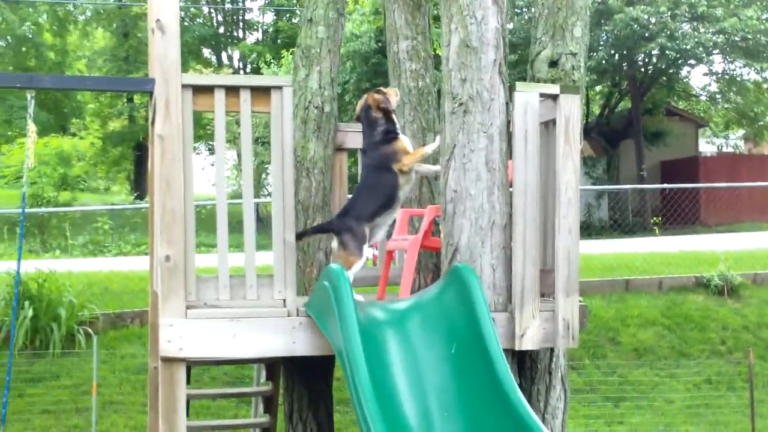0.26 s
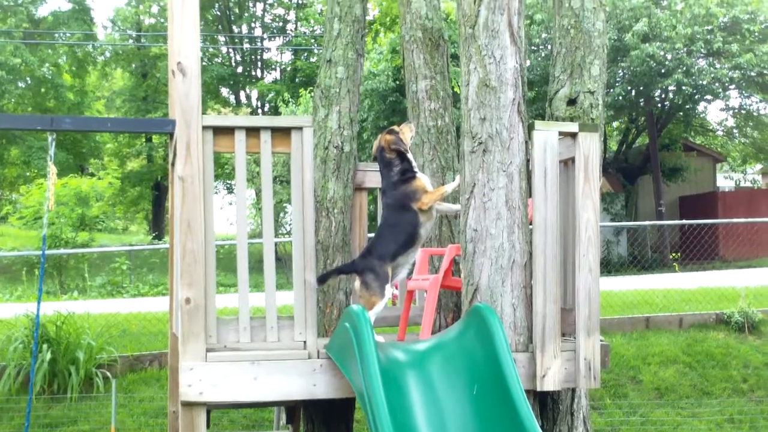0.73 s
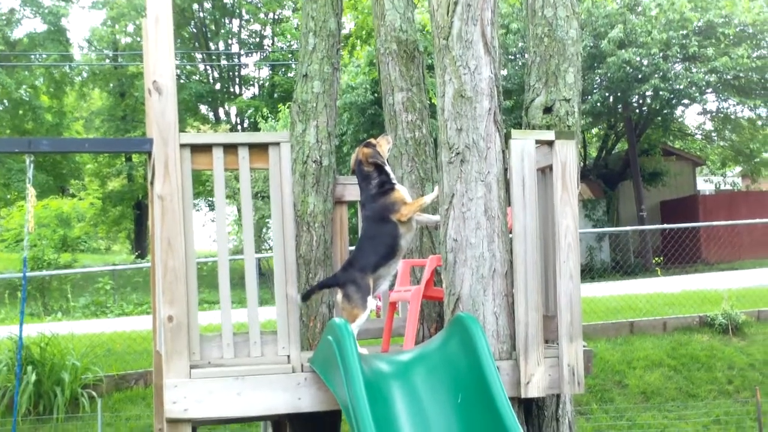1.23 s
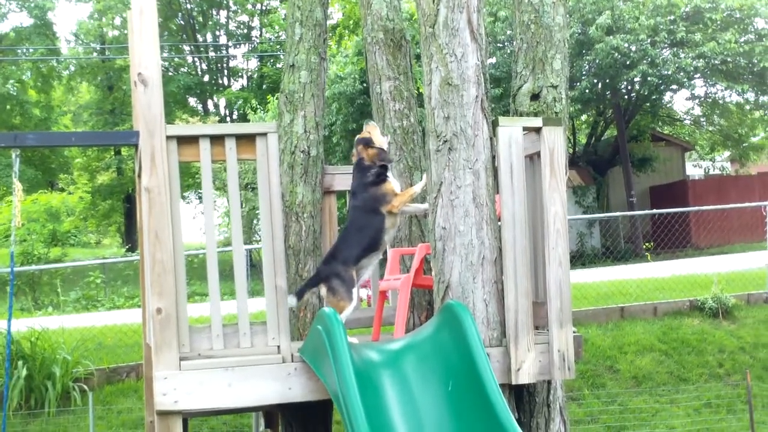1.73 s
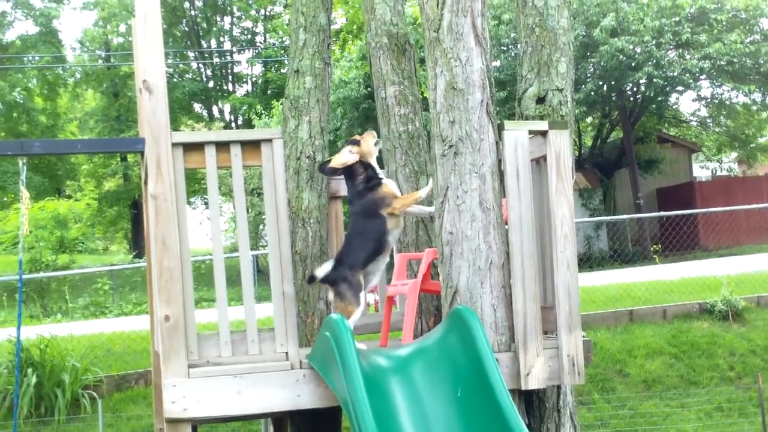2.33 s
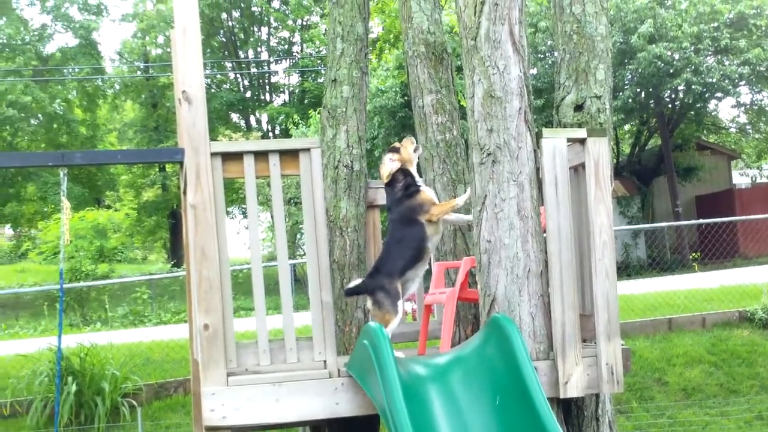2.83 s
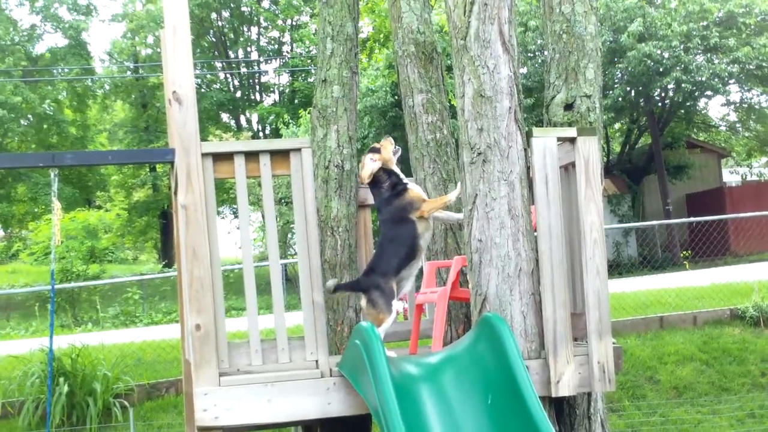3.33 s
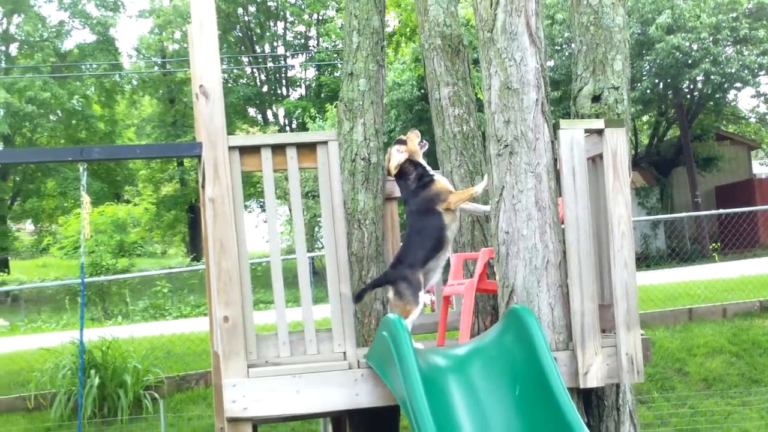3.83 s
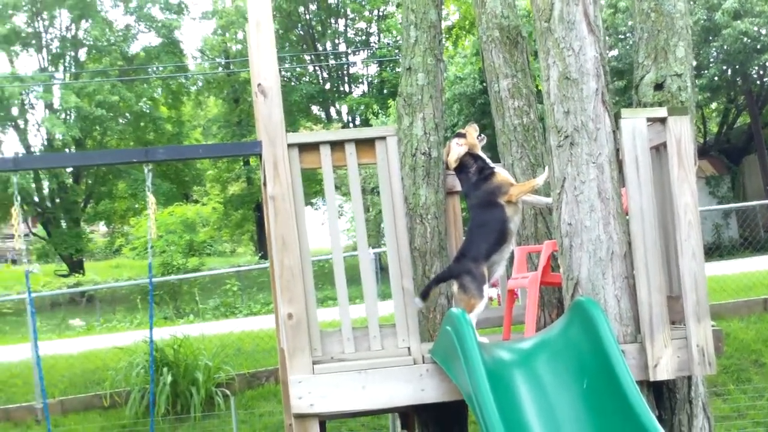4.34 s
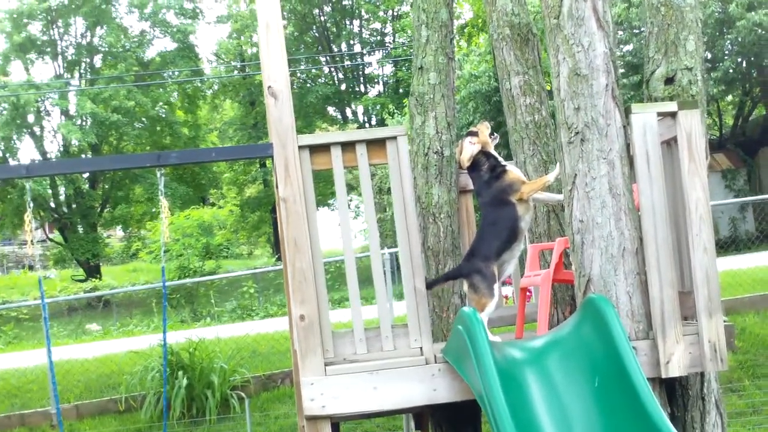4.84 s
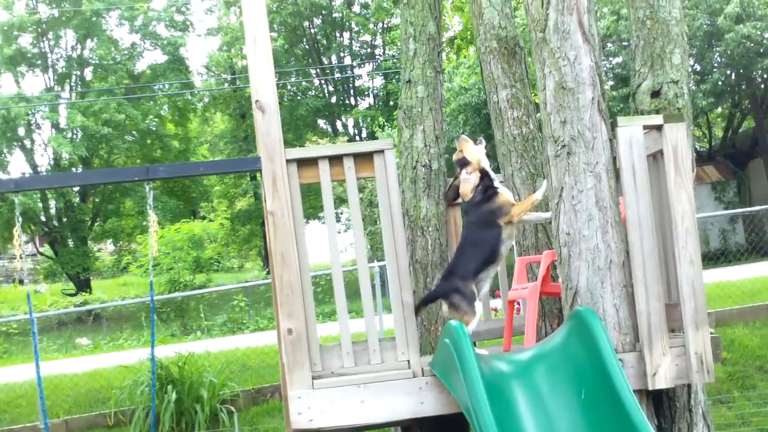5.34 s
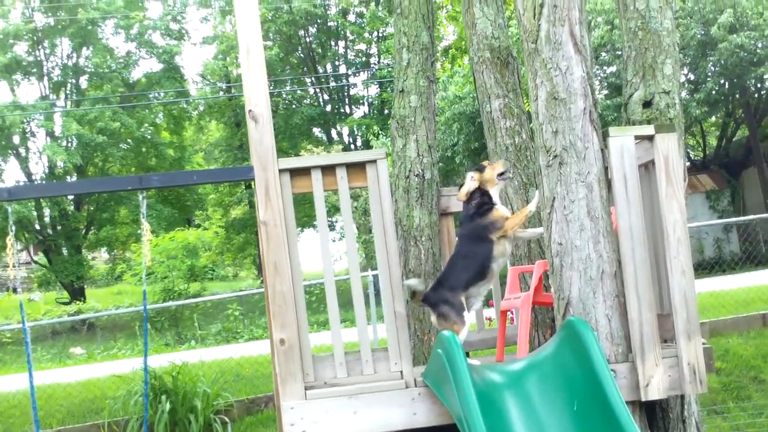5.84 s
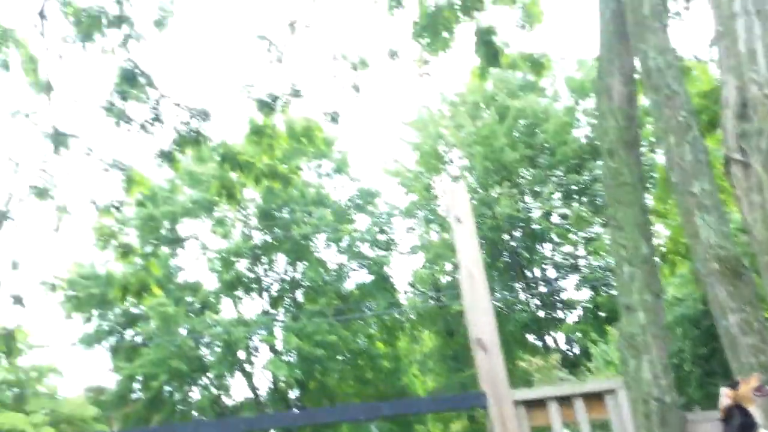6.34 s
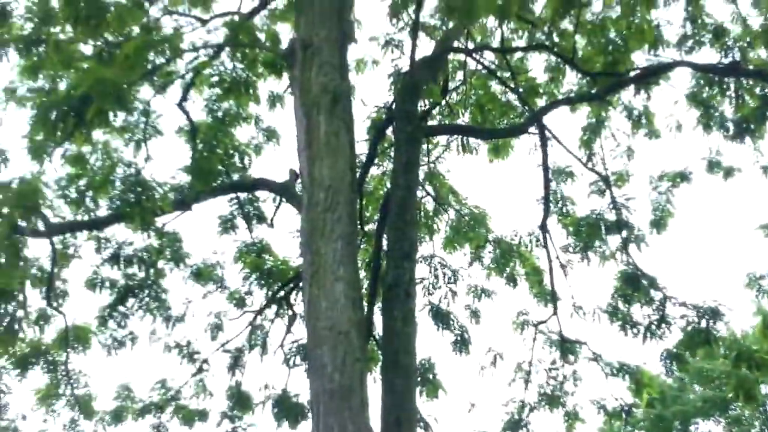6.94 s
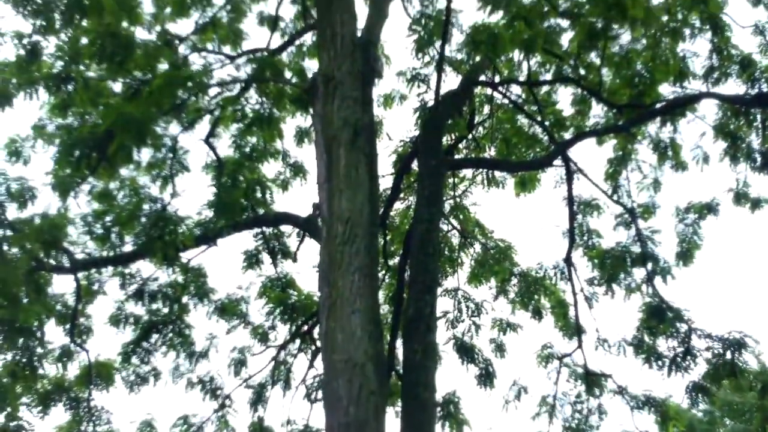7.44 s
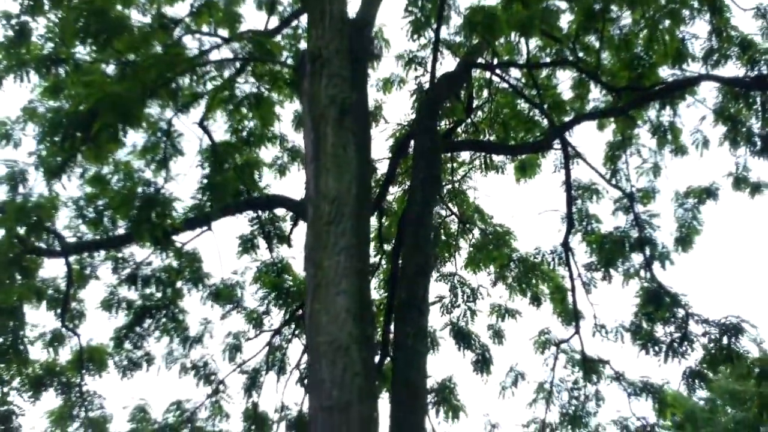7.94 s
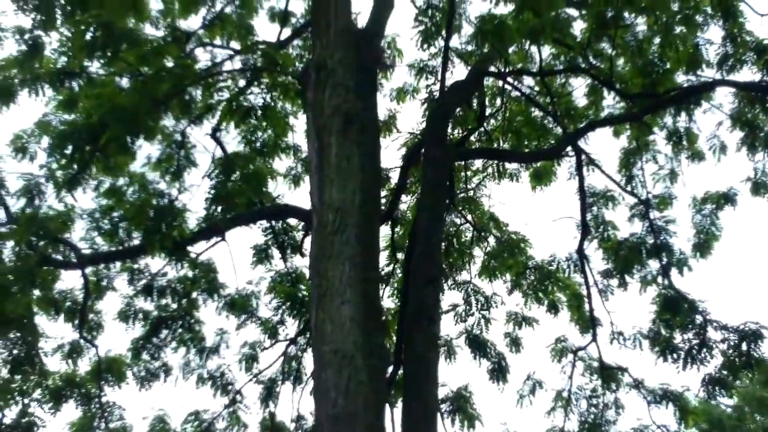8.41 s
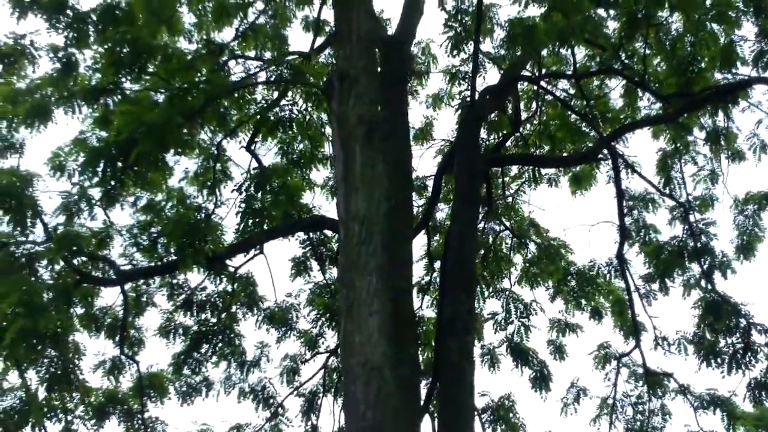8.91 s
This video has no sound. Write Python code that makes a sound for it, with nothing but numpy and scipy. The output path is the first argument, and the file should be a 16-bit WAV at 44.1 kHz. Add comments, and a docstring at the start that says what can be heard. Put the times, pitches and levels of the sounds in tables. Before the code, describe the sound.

A dog bays hoarsely three times with one short bark in an echoing backyard, while small birds chirp over a faint breeze.

```python
"""A back yard: a beagle bays up a tree, three long hoarse bays and one short bark. Trees and sheds answer.
Two bays open on a high yelp, the last on a grunt; each breaks into a rasp and clears as its pitch sinks.
Vocal folds make the tone; loose tissue and chopped air make the rasp. Small birds call over a light breeze,
a paw bumps a plastic slide, and a hand-held camera rustles and whines; its gain ducks under each bay."""
import sys
import numpy as np
from scipy import signal
from scipy.fft import rfft, irfft, next_fast_len
from scipy.io import wavfile
from scipy.ndimage import uniform_filter1d, minimum_filter1d, map_coordinates

SR = 44100
rng = np.random.default_rng(int(sys.argv[2]) if len(sys.argv) > 2 else 0)


def output_pcm(signal):
    """Save a mono or channel-first signal as 16-bit PCM at the path in sys.argv[1].

    Samples are clipped to [-1, 1] before scaling.
    """
    pcm = np.clip(np.atleast_2d(signal).T, -1, 1) * 32767
    wavfile.write(sys.argv[1], SR, np.round(pcm).astype(np.int16))


N = 404397
TIME_S = np.arange(N) / SR
CUTOFF_HZ = 15750


def from_db(db):
    return 10 ** (np.asarray(db) / 20)


def unit_rms(x):
    return x / np.sqrt(np.mean(x ** 2) + 1e-20)


def db_at(spectrum, hz):
    """Spectrum lookup on a log-frequency axis."""
    freq_hz, level_db = np.transpose(spectrum)
    return np.interp(np.log(np.maximum(hz, 1)), np.log(freq_hz), level_db)


def coloured(x, spectrum):
    """Noise shaped to a spectrum; unit RMS."""
    size = next_fast_len(len(x))
    gain = from_db(db_at(spectrum, np.fft.rfftfreq(size, 1 / SR)))
    return unit_rms(irfft(rfft(x, size) * gain, size)[:len(x)])


def resonant(x, hz, width_hz):
    """Two cascaded resonators; unit RMS."""
    r = np.exp(-np.pi * width_hz / SR)
    section = [1 - r, 0, r - 1, 1, -2 * r * np.cos(2 * np.pi * hz / SR), r * r]
    return unit_rms(signal.sosfilt([section, section], x))


def drift(rate_hz, size):
    """Smooth random curve, spread about 1."""
    step = SR / (2 * rate_hz)
    knots = rng.standard_normal(size // 8 + 8)[:int(size / step) + 4]
    return map_coordinates(knots, [np.arange(size) / step + 1], order=3, mode="nearest")


def phase_of(hz):
    return 2 * np.pi * np.cumsum(hz) / SR


def clock(length_s):
    return np.arange(int(length_s * SR)) / SR


def ramp(t, length_s):
    return np.clip(t / length_s, 0, 1)


def gate(t, attack_s, release_s):
    return ramp(t, attack_s) * ramp(t[-1] - t, release_s)


def placed(sounds):
    """Mix (start_s, sound) pairs into one track."""
    out = np.zeros(N)
    for start_s, sound in sounds:
        start = int(start_s * SR)
        out[start:start + len(sound)] += sound[:max(N - start, 0)]
    return out


# Open-air spectrum: freq_hz, density_db
AIR_SPECTRUM = [(12, -23.5), (20, 6.5), (61, -2), (427, -17), (597, -19), (746, -19.5), (932, -19.5),
                (2150, -22), (3450, -24), (7730, -33.5), (8640, -26.5), (9390, -32), (15500, -37)]
# Breeze strength: time_s, level_db
BREEZE_LEVELS = [(0, -51), (3.0, -50), (4.3, -47.5), (6.0, -47.5), (8.4, -46)]


def breeze():
    """Open air: low noise that slowly builds."""
    level_db = np.interp(TIME_S, *np.transpose(BREEZE_LEVELS)) + drift(6, N)
    return from_db(level_db) * coloured(rng.standard_normal(N), AIR_SPECTRUM)


def camera_whine(pitch_hz=8590, level_db=-69.5):
    """Thin, unsteady tone."""
    return from_db(level_db) * np.sqrt(2) * np.sin(phase_of(pitch_hz * (1 + .0028 * drift(200, N))))


def bird_note(length_s, from_hz, to_hz, level_db, bend, waver, peak_at=.41):
    """Quavering glide, loudest early; bend is the glide exponent."""
    progress = clock(length_s) / length_s
    glide_hz = to_hz + (from_hz - to_hz) * (1 - progress) ** bend
    pitch_hz = glide_hz * (1 + waver * drift(200, len(progress)))
    swell = 2 * progress ** peak_at * (1 - progress) ** (1 - peak_at)
    return swell * from_db(level_db + 3 * drift(60, len(progress))) * np.sin(phase_of(pitch_hz))


# Slurred bird notes: start_s, length_s, from_hz, to_hz, level_db
SLUR_NOTES = [(0.031, 0.22, 1000, 1270, -55.5), (0.849, 0.077, 7600, 7250, -48.5),
              (3.765, 0.17, 9600, 9090, -34), (4.24, 0.072, 3620, 3110, -52.5),
              (4.324, 0.085, 3150, 2680, -43), (4.73, 0.065, 3400, 2750, -46.5),
              (4.791, 0.17, 2425, 2270, -52), (5.711, 0.14, 2620, 3200, -50.5),
              (6.016, .16, 2790, 2510, -42.5), (6.173, 0.062, 3250, 2770, -49.5),
              (6.22, .14, 2414, 2200, -51), (6.333, 0.15, 2570, 2515, -49.5), (7.045, .17, 3550, 2950, -53),
              (7.074, 0.043, 2220, 2390, -47), (7.162, 0.1, 2790, 2520, -44.5),
              (7.187, .023, 4300, 4030, -43), (7.947, .19, 5870, 5820, -59),
              (8.425, 0.12, 3430, 3330, -55.5), (9.007, 0.076, 3080, 2820, -49.5)]


def bird_slurs():
    """Quick glides that level off; short ones quaver, long ones are purer."""
    return placed((start_s, bird_note(length_s, *row, bend=2.5, waver=.025 * np.exp(-length_s / .1)))
                  for start_s, length_s, *row in SLUR_NOTES)


def blurred_note(length_s, centre_hz, level_db, width_hz=410):
    """Swell of narrow noise: a far or buzzy note."""
    size = int(length_s * SR)
    band = resonant(rng.standard_normal(size), centre_hz, width_hz)
    return from_db(level_db) * np.sqrt(np.hanning(size)) * band


# Far bird calls: start_s, length_s, centre_hz, level_db
FAR_NOTES = [(0.078, 0.25, 3620, -62), (0.233, 0.33, 1360, -61), (1.452, 0.25, 1500, -59.5),
             (3.383, 0.06, 4440, -53.5), (3.95, 0.35, 1510, -57), (4.351, 0.3, 2480, -55.5),
             (4.851, 0.13, 3900, -55), (4.897, .2, 2480, -53.5), (7.2, .12, 2940, -52.5)]


def far_birds(chorus_per_s=2, low_hz=2360, high_hz=4270):
    """Calls blurred by trees, over a faint random chorus."""
    chorus = [(when * N / SR, blurred_note(.25, low_hz + height * (high_hz - low_hz), level_db=-66))
              for when, height in rng.random((int(chorus_per_s * N / SR), 2))]
    return placed(chorus + [(start_s, blurred_note(*row)) for start_s, *row in FAR_NOTES])


# One bird's chips: start_s, level_db
CHIP_NOTES = [(.411, -50.5), (1.084, -45), (1.444, -43), (2.673, -50.5), (3.08, -50)]


def bird_chips(length_s=.03, from_hz=4300, to_hz=5930):
    """Scratchy upward sweeps."""
    return placed((start_s, bird_note(length_s, from_hz, to_hz, level_db, bend=1.3, waver=.045))
                  for start_s, level_db in CHIP_NOTES)


def friction(touches, spectrum, grain_db):
    """Noise that swells and dies at each touch."""
    envelope = 0
    for peak_s, rise_s, t60_s, level_db in touches:
        below_peak_db = np.maximum(20 * (peak_s - TIME_S) / rise_s, 60 * (TIME_S - peak_s) / t60_s)
        envelope += from_db(level_db - below_peak_db.clip(0, 200))
    grains = rng.standard_normal(N) * from_db(grain_db * drift(200, N))
    return envelope * coloured(grains, spectrum)


# Dry rustles: peak_s, rise_s, t60_s, level_db
RUSTLE_TOUCHES = [(.68, 0.059, 1, -52), (1.257, 0.0013, 0.016, -39), (1.268, 0.0023, 0.021, -42),
                  (3.63, 0.074, 0.34, -39), (3.72, 0.012, 0.26, -56), (3.77, .005, 0.94, -63),
                  (6.075, 0.043, 0.21, -44), (6.35, 0.096, 0.21, -48)]
# Rustle spectrum: freq_hz, density_db
RUSTLE_SPECTRUM = [(500, -66), (1600, -1.5), (2200, -8.5), (3300, 6), (4600, -3), (5900, -1), (7000, -5.5),
                   (9500, -9), (12000, -14), (15000, -18)]


def rustles():
    """Bright, grainy friction close by."""
    return friction(RUSTLE_TOUCHES, RUSTLE_SPECTRUM, grain_db=2)


# Throat response, muzzle pursed: freq_hz, gain_db
THROAT_PURSED = [(700, -6), (1000, -0.5), (1100, 8.5), (1220, -6), (1560, -7.5), (1680, -30), (2150, -39),
                 (2680, -22), (3100, -52.5), (3650, -40.5), (4600, -45), (6200, -64), (7400, -46),
                 (14000, -78.5)]
# Throat response, muzzle gaping: freq_hz, gain_db
THROAT_GAPING = [(700, -5.5), (1070, 0), (1650, -5.5), (2150, -13.5), (2700, -22.5), (3250, -20.5),
                 (3800, -38.5), (6400, -42), (9600, -32), (11500, -53), (15000, -68.5)]


def fold_harmonics(phase, pitch_hz, mouth, multiples, flutter_db, tilt_db_per_octave=0):
    """Vocal-fold partials through the throat; mouth 0 is pursed, 1 gaping."""
    out = 0
    for k in multiples:
        hz = k * pitch_hz
        level_db = (1 - mouth) * db_at(THROAT_PURSED, hz) + mouth * db_at(THROAT_GAPING, hz)
        level_db += tilt_db_per_octave * np.log2(k) + flutter_db * drift(68.4, len(phase))
        out += np.sqrt(2) * from_db(level_db) * np.sin(k * phase) * (hz < CUTOFF_HZ)
    return out


# Turbulence of a gaping mouth: freq_hz, density_db
MOUTH_NOISE = [(900, -25), (1700, 3), (2100, -5), (2700, -7), (3300, -5), (3900, -29), (6500, -22),
               (9500, -22.5), (15000, -39.5)]
# Yelps opening the first two bays: start_s, length_s, from_hz, to_hz, relative_db
YELP_CALLS = [(1.805, .05, 1061, 1069, -7.5), (5.219, .04, 1068, 1014, -7.5)]


def yelp(length_s, from_hz, to_hz, relative_db):
    """Pressed, clear cry through a gaping mouth; cracks toward the end."""
    t = clock(length_s)
    cracking = (t / length_s) ** 3
    pitch_hz = from_hz + (to_hz - from_hz) * t / length_s
    jitter = .00786 * drift(70, len(t)) + .023 * cracking * drift(400, len(t))
    phase = phase_of(pitch_hz * (1 + jitter))
    cry = fold_harmonics(phase, pitch_hz, 1, range(1, 15), flutter_db=5, tilt_db_per_octave=.7)
    hiss = from_db(-32 + 18 * cracking) * coloured(rng.standard_normal(len(t)), MOUTH_NOISE)
    return gate(t, .011, .0093) * from_db(relative_db) * (cry + hiss)


# Loose tissue beating with the folds: pitch_ratio, relative_db
TISSUE_TONES = [(1.27, -14.5), (1.554, -7.5), (1.74, -11.5), (2.229, -13)]
# Throat turbulence: freq_hz, density_db
THROAT_NOISE = [(300, -31.5), (480, -24.5), (600, -0.5), (1050, -1), (1400, -3.5), (1600, -15.5),
                (1800, -22), (2650, -27), (3000, -47), (15000, -82)]
# Upper muzzle resonances: centre_hz, width_hz, gain_db
MUZZLE_MODES = [(2700, 300, 2.5), (3580, 300, 1), (4450, 750, 1), (5030, 300, -9), (7260, 650, -1),
                (8200, 350, -6.5), (9000, 550, -10), (10100, 800, -11), (11500, 900, -15.5)]


def dog_voice(pitch_hz, tone_db, overtone_db, rasp_db, mouth, jitter=.0082,
              tissue_db=0, throat_db=-7, mouth_db=-11, rush_db=-37, top_harmonic=20):
    """Folds sound a clear tone; driven hard, they beat with loose tissue and chop the air into a rasp."""
    size, mouth = len(pitch_hz), np.clip(mouth, 0, 1)
    tone, overtones, rasp = from_db(tone_db), from_db(overtone_db), from_db(rasp_db)
    roughness = rasp / (tone + overtones + rasp)
    phase = phase_of(pitch_hz * (1 + jitter * drift(60, size) + .017 * roughness * drift(250, size)))
    clear = np.sqrt(2) * tone * np.sin(phase) * from_db(drift(60, size))
    clear += overtones * fold_harmonics(phase, pitch_hz, mouth, range(2, top_harmonic + 1), 1.3)

    hoarse = 0
    for ratio, relative_db in TISSUE_TONES:
        gain = np.sqrt(2) * from_db(tissue_db + relative_db + 3 * drift(35, size))
        wander = phase_of(pitch_hz * .018 * drift(120, size))
        hoarse += gain * np.sin(ratio * phase + wander)
    puffs = rng.standard_normal(size) * (1 + .72 * np.cos(phase))  # air escapes once a cycle
    hoarse += from_db(throat_db) * coloured(puffs, THROAT_NOISE)
    hoarse += from_db(mouth_db) * mouth * coloured(puffs, MOUTH_NOISE)

    rush = sum(from_db(gain_db) * np.sqrt(width_hz) * resonant(puffs, hz, width_hz)
               for hz, width_hz, gain_db in MUZZLE_MODES)
    airflow = (tone + rasp + .3 * overtones) * from_db(rush_db + 2.5 * drift(70, size))
    return clear + rasp * hoarse + airflow * unit_rms(rush)


# Long bays, levels relative:
# start_s, length_s, top_hz, sag_hz, fundamental_db, fade_db_per_s, hoarse_db, clear_after_s, gape_fraction
BAY_CALLS = [(1.839, .504, 649.3, 137.7, -11.5, 27.5, -14, 0.32, 0.8),
             (5.249, 0.48, 638, 102, -12, 29.5, -14, 0.36, 0.84),
             (7.393, .496, 626.8, 84.2, -15.5, 14.5, -11, 0.43, 0)]


def bay(length_s, top_hz, sag_hz, fundamental_db, fade_db_per_s, hoarse_db, clear_after_s, gape,
        scoop_hz=68.26, end_hz=501):
    """Hoarse upward scoop, sagging pursed howl, brighter clear end; a gape favours the overtones."""
    t = clock(length_s)
    scooping = 1 - ramp(t, .075)
    gaping = gape * (1 - ramp(t - .03, .049))
    cleared = ramp(t - clear_after_s, .05)
    dropping = 1 - ramp(length_s - t, .08)  # breath runs out
    sputter = 1 - ramp(length_s - t, .027)  # folds let go
    pitch_hz = top_hz - scoop_hz * scooping - sag_hz * (t / length_s) ** 2
    pitch_hz += (end_hz - pitch_hz) * dropping
    tone_db = fundamental_db - fade_db_per_s * t - 13.5 * gaping - 15.5 * dropping
    overtone_db = -33 + 24 * gaping + 6.5 * cleared + 10 * dropping
    rasp_db = hoarse_db + 2 * scooping - 25 * t - 16 * cleared + 20.5 * sputter
    mouth = gaping + .23 * cleared
    return gate(t, .012, .033) * dog_voice(pitch_hz, tone_db, overtone_db, rasp_db, mouth)


def bark(length_s=.115, from_hz=520, glide_hz_per_s=750, break_at_s=.061, breaking_s=.016,
         decay_db_per_s=652):
    """Folds catch roughly, ring clear and rise, then break up as the jaw closes."""
    t = clock(length_s)
    catching = 1 - ramp(t, .031)
    broken = ramp(t - break_at_s, breaking_s)
    pitch_hz = from_hz + glide_hz_per_s * (break_at_s - np.abs(t - break_at_s))
    loss_db = 10 * catching + 18 * broken
    decay_db = decay_db_per_s * np.maximum(t - break_at_s - breaking_s, 0)
    rasp_db = -25 + 9 * catching + 15 * broken - decay_db
    voice = dog_voice(pitch_hz, -19.5 - loss_db, -12.5 - loss_db, rasp_db, mouth=.93 - .24 * broken,
                      jitter=.0064, tissue_db=2, throat_db=-3.5, mouth_db=-8, rush_db=-31, top_harmonic=10)
    return gate(t, .0077, .015) * voice


def near_bird(buzz_s=3.62, whistle_s=3.9, from_hz=6150, to_hz=6830, throb_s=.123, fade_db_per_s=6):
    """High buzz, then a throbbing whistle that climbs and levels off."""
    buzz = blurred_note(length_s=.37, centre_hz=8500, level_db=-50.5, width_hz=1500)
    t = clock(.27)
    climb = np.sin(np.pi / 2 * ramp(t, .29)) ** 2
    phase = phase_of((from_hz + (to_hz - from_hz) * climb) * (1 + .003 * drift(80.8, len(t))))
    tone = np.sin(phase) + from_db(-21) * np.sin(2 * phase)
    ebb = np.maximum(1 - t % throb_s / .011, t % throb_s / throb_s)  # fast rise, slow fall
    level_db = -24 - fade_db_per_s * t - 12 * ebb
    burr = 1 + .1 * drift(900, len(t))
    whistle = gate(t, .028, .022) * burr * from_db(level_db) * tone
    return placed([(buzz_s, buzz), (whistle_s, whistle)])


# Paw bumps: start_s, level_db
PAW_BUMPS = [(4.422, -34.5), (4.455, -35)]
# Hollow slide modes: freq_hz, gain_db, t60_s
SLIDE_MODES = [(229.7, 0, 0.47), (261, 4.5, 0.1), (295, -14.5, 0.59)]


def slide_bumps(attack_s=.0093):
    """A paw softly rings the low modes of the plastic."""
    t = clock(.5)
    ring = sum(from_db(gain_db - 60 * t / t60_s) * np.sin(2 * np.pi * hz * t)
               for hz, gain_db, t60_s in SLIDE_MODES)
    ring *= 1 - np.exp(-t / attack_s)
    return placed((start_s, from_db(level_db) * ring) for start_s, level_db in PAW_BUMPS)


# Another bird's twitters: start_s, spacing_s, level_db
TWITTER_RUNS = [(6.668, .03, -42), (7.968, .045, -46.5)]


def bird_twitters(note_s=.033, top_hz=4350, step_hz=398, fall_hz=1167):
    """Runs of three steeply falling notes, each lower than the last."""
    return placed((start_s + k * spacing_s, bird_note(note_s, hz, hz - fall_hz, db, bend=.8, waver=.035))
                  for start_s, spacing_s, db in TWITTER_RUNS
                  for k, hz in enumerate(top_hz - step_hz * np.arange(3)))


def grunt(length_s=.041, from_hz=354.6, rise_hz=150):
    """Lead-in to the last bay: pitch and level climb ever faster as pressure builds."""
    t = clock(length_s)
    pressure = (t / length_s) ** 3
    swell_db = -31 + 19 * pressure
    voice = dog_voice(from_hz + rise_hz * pressure, swell_db - 3, swell_db, swell_db + 4.5, mouth=.15)
    return gate(t, .009, .0053) * voice


# Finger touches: peak_s, rise_s, t60_s, level_db
FINGER_TOUCHES = [(8.908, .001, 0.079, -26), (8.932, .004, 0.056, -42), (8.957, 0.0011, 0.044, -34.5),
                  (9.0, 0.055, 0.33, -47.5), (9.12, 0.12, 0.7, -33.5)]
# Camera body response: freq_hz, gain_db
CASE_SPECTRUM = [(100, 0), (500, -12), (900, -4), (1300, 7), (1700, -19), (3400, -18.5), (5300, -10.5),
                 (7000, -25), (9500, -23), (15000, -33)]


def camera_handling():
    """Fingers shift on the camera body."""
    return friction(FINGER_TOUCHES, CASE_SPECTRUM, grain_db=0)


def yard_echoes(direct, carried, near_db, far_db, near_t60_s, far_t60_s, lowpass_hz, echoes_per_s=700):
    """Adds sparse bright echoes off play set and trunks, and a dull tail of what reaches trees and sheds."""
    t = clock(2)
    onset = ramp(t - .008, .02)
    near = rng.standard_normal(len(t)) * (rng.random(len(t)) < echoes_per_s / SR)
    near *= from_db(-60 * t / near_t60_s) * onset
    far = rng.standard_normal(len(t)) * from_db(-60 * t / far_t60_s) * onset
    far = signal.sosfilt(signal.butter(1, lowpass_hz, fs=SR, output="sos"), far / np.linalg.norm(far))
    echoes = from_db(near_db) * signal.fftconvolve(direct, near / np.linalg.norm(near))
    tail = from_db(far_db) * signal.fftconvolve(carried, far)
    return direct + (echoes + tail)[:N]


def scene(dog_gain_db=8.5, bark_carry_db=-20.5):
    """Dog and birds with yard echoes; close noises and air dry. Mono."""
    baying = placed((start_s, bay(*row)) for start_s, *row in BAY_CALLS)
    baying += placed((start_s, yelp(*row)) for start_s, *row in YELP_CALLS)
    baying += placed([(7.358, grunt())])
    barking = placed([(3.1, bark())])
    carried = baying + from_db(bark_carry_db) * barking
    dog = yard_echoes(baying + barking, carried, near_db=-13, far_db=-29.5,
                      near_t60_s=.47, far_t60_s=2.2, lowpass_hz=2500)
    close = slide_bumps() + rustles() + camera_handling()
    background = breeze() + camera_whine()
    song = bird_slurs() + bird_chips() + bird_twitters() + near_bird() + far_birds()
    birds = yard_echoes(song, song, near_db=-6, far_db=-4, near_t60_s=.33, far_t60_s=.64, lowpass_hz=8920)
    return (from_db(dog_gain_db) * dog + birds + close + background)[None]


def record(dry, threshold_db=-26, max_duck_db=8, release_db_per_s=70, limit=.92, soft_ceiling=.75):
    """Ducking gain control, peak limiter, soft clip, steep low-pass."""
    power = uniform_filter1d(dry[0] ** 2, size=256)
    excess_db = 10 * np.log10(np.maximum(power, 1e-12)) - threshold_db
    release_db = release_db_per_s * TIME_S
    held_db = np.maximum.accumulate(excess_db + release_db) - release_db
    ducked = dry * from_db(-uniform_filter1d(np.clip(held_db, 0, max_duck_db), size=128))
    limiter_gain = np.minimum(1, limit / (np.abs(ducked) + 1e-9))
    limited = ducked * uniform_filter1d(minimum_filter1d(limiter_gain, size=128), size=128)
    rounded = limited / (1 + (limited / soft_ceiling) ** 10) ** (1 / 10)
    return signal.sosfilt(signal.ellip(12, .1, 90, CUTOFF_HZ, fs=SR, output="sos"), rounded)


dry = scene()
out = record(dry)
output_pcm(out)
```